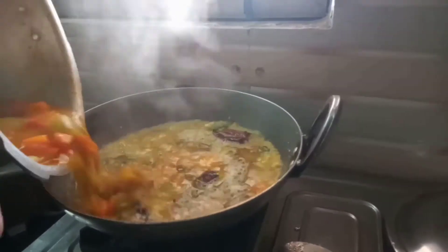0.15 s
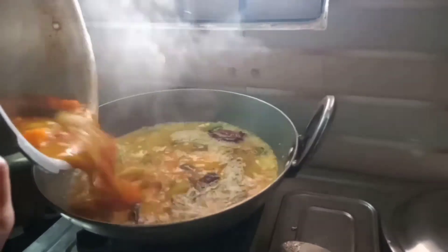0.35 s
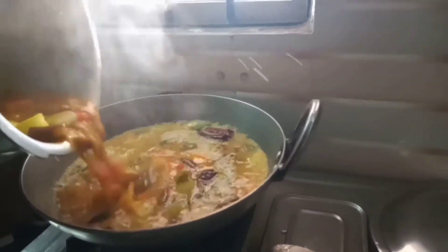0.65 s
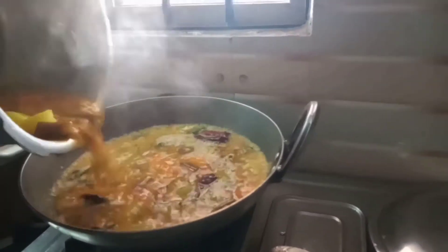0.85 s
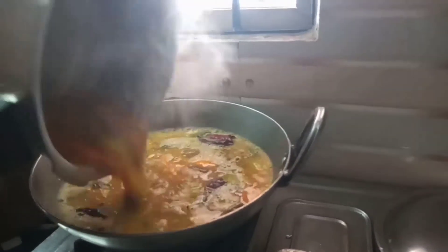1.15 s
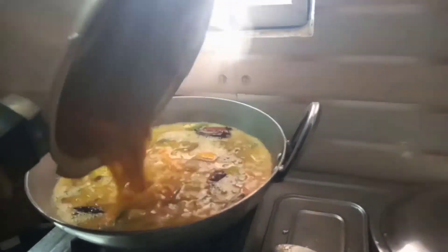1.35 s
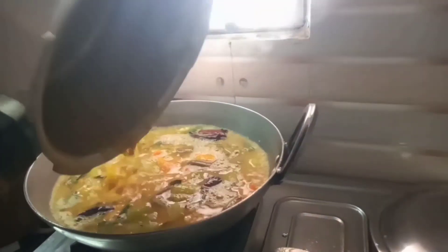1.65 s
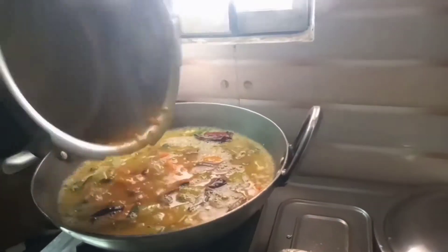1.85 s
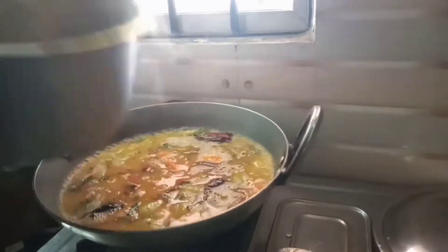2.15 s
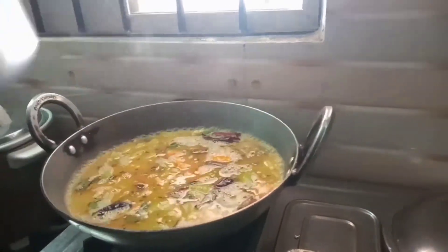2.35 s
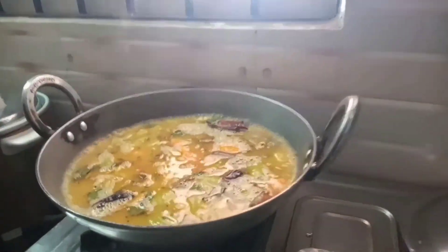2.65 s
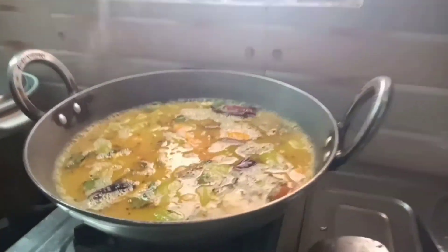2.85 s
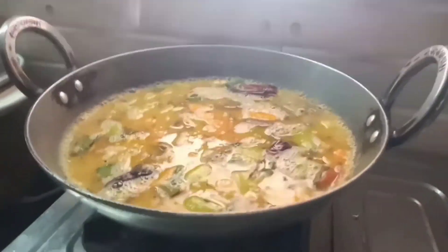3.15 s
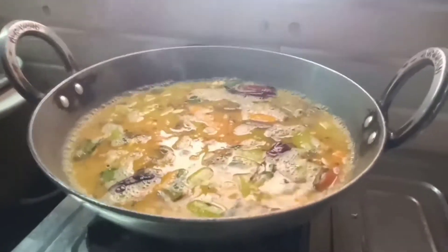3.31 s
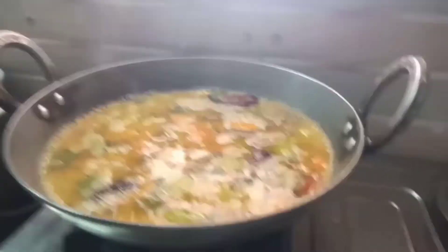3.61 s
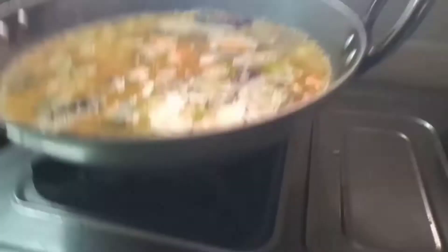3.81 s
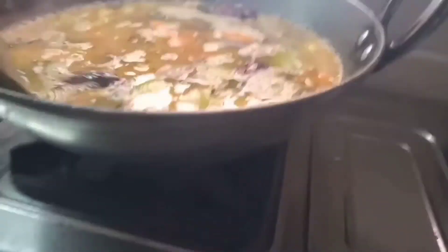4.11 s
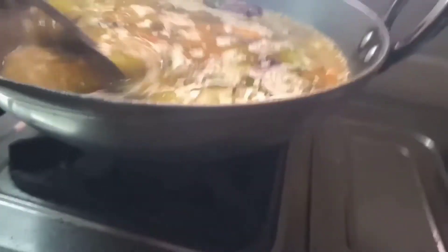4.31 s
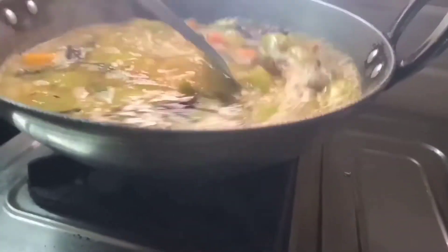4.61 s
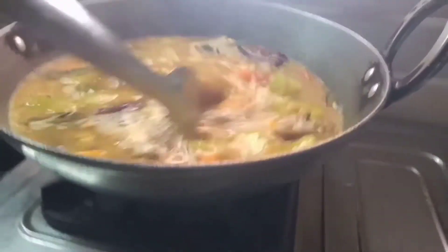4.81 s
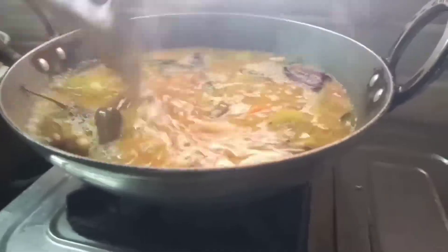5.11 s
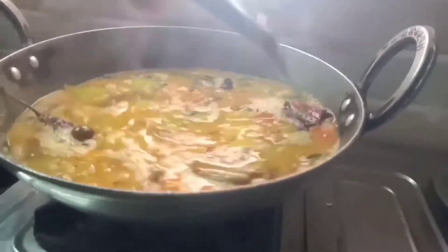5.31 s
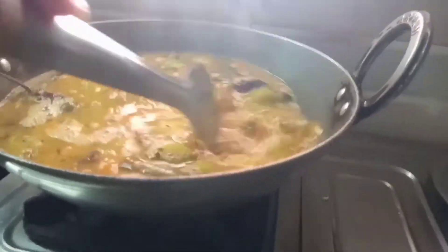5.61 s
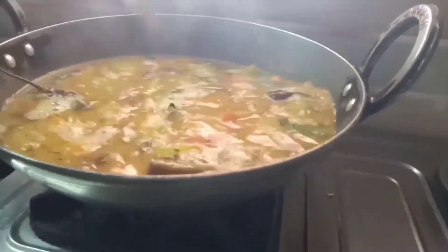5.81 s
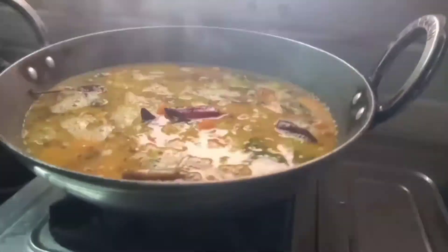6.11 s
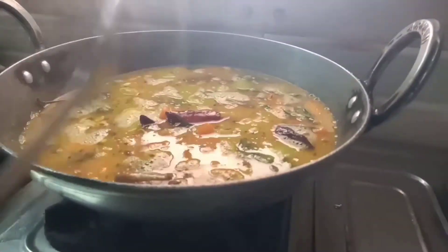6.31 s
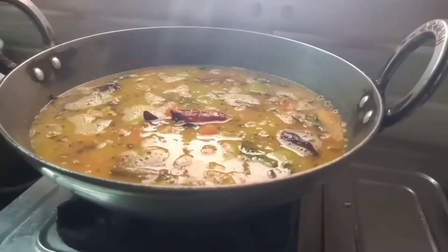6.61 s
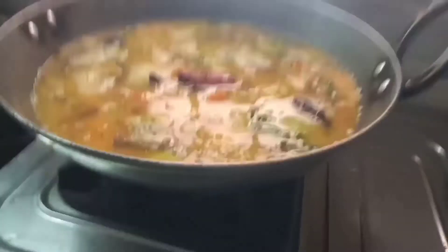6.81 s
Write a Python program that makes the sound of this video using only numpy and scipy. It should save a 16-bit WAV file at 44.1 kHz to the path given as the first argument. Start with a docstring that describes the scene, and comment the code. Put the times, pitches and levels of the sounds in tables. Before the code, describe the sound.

A pan of stew sizzles and bubbles as an empty pot clatters down, then a ladle knocks about and is put aside.

```python
"""Lentil stew poured into hot oil

In a small kitchen, stew is tipped into hot oil in a steel pan over a rumbling gas flame.
Water drops burst in the oil, and the sizzle slowly dies down while the thick stew bubbles.
The empty pot scrapes the rim, then clanks and thumps onto the worktop among other pots.
A ladle stirs, waking the sizzle on the hot wall and knocking dully on the pan.
A few faint hums come and go, and the ladle is laid aside with a clink."""
import sys
import numpy as np
from scipy import signal
from scipy.fft import rfft, irfft
from scipy.io import wavfile

SR = 44100
rng = np.random.default_rng(int(sys.argv[2]) if len(sys.argv) > 2 else 0)


def wav_out(sig):
    """Save sig, one row per channel (or a flat mono array), as 16-bit PCM at SR to the path in sys.argv[1]."""
    wavfile.write(sys.argv[1], SR, np.round(np.clip(np.atleast_2d(sig).T, -1, 1) * 32767).astype(np.int16))


N = 306936
TIME = np.arange(N) / SR

# Levels are relative. A mode is a tone an object rings at; ring_s is the time to fade by 60 dB.
# the steady sizzle sinking as the stew cools the oil: time_s, level_db
COOLING = [(0.0, -30), (0.95, -33.5), (1.45, -34.5), (2.5, -39), (3.05, -43), (3.45, -42), (3.85, -45.5),
           (5.0, -44.5), (5.42, -52), (5.8, -52.5), (6.1, -57), (6.65, -58)]
# the sizzle flaring as stew washes over hot steel: peak_s, level_db, half_length_s
SIZZLE_FLARES = [(0.157, -36.5, 0.017), (0.387, -42, 0.019), (0.604, -33.5, 0.1), (0.87, -38.5, 0.06),
                 (1.097, -36.5, 0.053), (1.304, -34.5, 0.17), (4.028, -43, 0.09), (4.328, -36, 0.1),
                 (4.676, -38, 0.092), (4.883, -38, 0.091), (5.17, -43, 0.083)]
# the stew's bubbling, which settles when the stirring ends: time_s, level_db
SIMMER_LEVELS = [(0.05, -53.5), (0.45, -49), (0.85, -52), (2.2, -55.5), (3.0, -60), (4.7, -56.5),
                 (5.55, -62.5), (6.05, -72.5)]
# how strong each sound is from low to high: pitch_hz, level_db
SIZZLE_TONE = [(250, -31), (800, -6), (1200, -10.5), (1800, -3.5), (2080, 2.5), (2400, 6), (3000, -0.5),
               (3450, 1), (4000, 0.73), (6000, 1.5), (7500, -3), (9000, -13.5), (16000, -43)]
SPRAY_TONE = [(4000, -22.5), (5700, 7.5), (7500, 7.5), (9000, 5.5), (16000, 6)]
STEW_TONE = [(150, -13), (300, 6), (480, 2.5), (780, 10), (1050, 6.5), (1500, 6), (2500, -22.5)]
FLAME_TONE = [(20, -38), (40, -10.5), (70, 3), (112, 10.5), (145, 6.5), (180, -10), (280, -10), (450, -42),
              (1500, -26)]
STEEL_TONE = [(70, -12), (120, 19), (180, -6.5), (280, 9.5), (430, 7), (620, 7.5), (900, 4), (1200, 4.5),
              (1700, -2.5), (2300, 11), (3000, 2), (4600, -4.5), (9000, -5.5), (16000, -3)]
CRACK_TONE = [(500, -65), (1500, 15), (4000, 7), (7000, 12), (9000, 14.5), (16000, 5)]  # the first snap of a bump
POT_AIR_TONE = [(90, -44), (220, 7), (360, 3.5), (540, 15), (720, 7.5), (1050, 10), (1350, -7), (4000, -41)]
# hand-held pots bumping together: start_s, crack_db, body_db, clang_db, ring_s
BUMPS = [(0.214, -13, -34, -22, 0.18), (0.238, -32, -38, -30, 0.58), (1.858, -14, -36, -16.5, 0.051),
         (1.882, -32, -33.5, -27.5, 0.32), (1.904, -13.5, -33, -32, 1), (1.966, -40, -31.5, -27.5, 0.28),
         (1.993, -32, -38.5, -37, 0.3), (2.508, -40, -46, -38, 0.17), (2.615, -10.5, -29, -25, 0.2),
         (2.686, -25.5, -36.5, -33.5, 0.21), (2.758, -39, -24.5, -21, 0.23), (2.799, -43, -36, -29.5, 0.31),
         (3.655, -29, -50, -48, .05), (3.904, -11.5, -47.5, -36.5, 0.27), (3.956, -15, -46.5, -38, 0.24)]
# pots landing on the worktop: start_s, crack_db, body_db, clang_db, ring_s, thump_db
POT_LANDINGS = [(3.28, -23, -39.5, -27.5, 0.14, -31.5), (3.477, -35, -27, -24, 0.24, -29),
                (3.486, -37, -29, -21.5, 0.26, -35), (3.586, -42, -39, -28.5, 0.048, -35),
                (3.632, -45, -46, -46, 0.13, -41.5), (6.871, -18, -36, -24.5, 0.24, -43)]
# the pot's edge skidding over the pan's rim: start_s, level_db, ring_s
RIM_SKIDS = [(1.86, -14.5, 0.049), (1.872, -25, 0.49), (1.905, -27, 0.43), (1.95, -35, 0.22),
             (2.617, -31.5, 0.38), (6.879, -34, .22)]
# the rim's modes: pitch_hz, width_hz, level_db
RIM_MODES = [(2330, 140, 6.5), (3630, 23, 5), (3480, 37, -3), (4260, 48, 3), (4700, 95, 3), (5400, 69, 3.5),
             (6010, 44, 8.5), (5860, 110, -15), (6560, 82, -21)]
# the empty pot and the ladle being put down: start_s, level_db, thump_db
POT_SET_DOWN = [(3.11, -14, -37)]
LADLE_SET_DOWN = [(6.735, -16.5, -42)]
# each object's modes: pitch_hz, level_db, ring_s
EMPTY_POT_MODES = [(528, -3, .48), (646, -5, .5), (1030, -1, .24), (1588, -4, .38), (2310, 4, .47),
                   (2880, -5, .4), (3830, -6, .3), (3880, -3, .38), (4440, -11, .4), (4650, -9, .4),
                   (5355, -4, .5), (6062, -9, .4), (6365, -4, .14), (6680, -3, .24), (7590, -7, .23)]
WORKTOP_MODES = [(79, -13, 0.34), (106, 0.5, 0.41), (137, -5, 0.22), (199.4, 1.5, 0.14), (230.8, -6, 0.3)]
LADLE_MODES = [(1200, -2.5, 0.1), (1432, -1, 0.15), (1620, -2.5, 0.16), (1975, -6.5, 0.29),
               (2260, -0.5, 0.038), (2770, -6.5, 0.029), (3345, -3.5, 0.03), (3450, -2.5, 0.031),
               (3890, -13, 0.2), (5356, -9.5, 0.042)]
FULL_PAN_MODES = [(238, 3, 0.048), (304.3, 3.5, .16), (362, 3, 0.086), (456, -9, 0.029), (582, 0.5, 0.088),
                  (705, 0, .08), (980, -14, 0.08), (1405, -9.5, 0.081), (1887, -11.5, 0.064),
                  (2290, -5.5, 0.034), (2500, -13.5, 0.1), (2730, -17, 0.11)]
HANDLE_MODES = [(277, -3.5, 0.17), (1432, -8, .3), (1896, 9, 0.056), (2190, 1, 0.1), (3370, 7.5, 0.056),
                (4110, -2, 0.091), (5900, -16, .14), (6191, -11, .25), (7630, 5.5, .1), (11680, 0, .13),
                (14700, -10, .06), (15400, -6, .06)]
# the ladle ringing as it is picked up, and its handle dropping: start_s, level_db
LADLE_PICKUPS = [(3.283, -35.5), (3.481, -31.5)]
HANDLE_DROP = [(6.874, -33.5)]
# the ladle hitting the full pan: start_s, knock_db, bass_db, scratch_db, slosh_lead_s
STIR_KNOCKS = [(4.573, -26, -29.5, -33, 0.0037), (4.778, -25, -33, -39, 0.012),
               (4.835, -29, -33.5, -50, .008), (5.1, -29, -26.5, -36, .001), (5.179, -35.5, -39, -49, .004),
               (5.338, -32.5, -36, -58, 0.0046), (5.399, -43, -50, -52, 0.01),
               (5.732, -27.5, -29, -34, 0.0033), (5.971, -32, -33.5, -58, 0.0087),
               (6.037, -38, -46, -57, 0.0093), (6.12, -45, -41.5, -56, .012)]
# faint hums after the stirring: peak_s, level_db, half_length_s, pitch_hz
LOW_HUMS = [(6.17, -57.5, 0.1, 314), (6.316, -58.5, 0.054, 600), (6.487, -62, 0.055, 327),
            (6.625, -60.5, 0.057, 613)]
# the microphone's opening, which has two peaks with a dip between: pitch_hz, gain_db
MICROPHONE_TONE = [(1000, -2), (5100, 1.5), (5700, 3.5), (6150, 9), (6650, 4.5), (7100, -6), (8200, -15.5),
                   (9500, -17), (11000, -19.5), (13800, -18.5), (14700, -8), (16000, -7)]


def from_db(db):
    """Turn decibels into a number to multiply a sound by."""
    return 10 ** (np.asarray(db) / 20)


def unit_power(x):
    """Scale a sound so that its average power is 1."""
    return x / np.sqrt(np.mean(x ** 2) + 1e-20)


def noise():
    """A fresh, even hiss."""
    return rng.standard_normal(N)


def curve(points):
    """Join (time, value) points with straight lines."""
    return np.interp(TIME, *np.transpose(points))


def drift(rate_hz):
    """A smooth random wobble, about 1 in size."""
    step, warm_up = 40, 2000  # in samples
    decay = np.exp(-2 * np.pi * step * rate_hz / SR)
    jitter = rng.standard_normal(N // step + warm_up + 2)
    slow = signal.lfilter([1], [1, -2 * decay, decay * decay], jitter)[warm_up:]
    return np.interp(np.arange(N) / step, np.arange(len(slow)), unit_power(slow))


def shaped(x, tone, size=4096):
    """Make a sound's lows and highs follow a tone table."""
    hz, db = np.transpose(tone)
    grid_hz = np.maximum(np.arange(size // 2 + 1) * SR / size, 1)
    gains = from_db(np.interp(np.log(grid_hz), np.log(hz), db))
    cepstrum = irfft(np.log(gains))
    # fold the filter so that it never rings before the sound arrives
    cepstrum[1:size // 2] *= 2
    cepstrum[size // 2 + 1:] = 0
    return signal.fftconvolve(x, irfft(np.exp(rfft(cepstrum))))[:len(x)]


def band(x, low_hz, high_hz):
    """Keep the part of a sound between two pitches."""
    return signal.sosfilt(signal.butter(2, [low_hz, high_hz], "band", fs=SR, output="sos"), x)


def ring(force, hz, ring_s):
    """One mode: every push starts a pure tone that fades away."""
    decay, angle = from_db(-60 / (ring_s * SR)), 2 * np.pi * hz / SR
    feedback = [1, -2 * decay * np.cos(angle), decay * decay]
    return signal.lfilter([0, np.sin(angle)], feedback, force + 1e-18)


def clicks(per_s, spread_db):
    """Random clicks of uneven size."""
    sizes = from_db(spread_db * np.minimum(rng.exponential(1, N), 5)) * rng.choice([-1, 1], N)
    return sizes * (rng.random(N) < per_s / SR)


def bursts(starts_s, levels_db, ring_s, rise_s):
    """The loudness of hits that rise quickly and die away."""
    power = np.zeros(N)
    for start_s, db, fade_s in np.broadcast(starts_s, levels_db, ring_s):
        start = round(start_s * SR)
        age = TIME[:N - start][:SR]
        rise = 1 - np.exp(-age / rise_s)
        power[start:start + SR] += (rise * from_db(db - 60 * age / fade_s)) ** 2
    return np.sqrt(power)


def swell(peak_s, db, half_length_s):
    """A smooth, bell-shaped rise and fall in loudness."""
    return from_db(db) * np.exp(-.5 * ((TIME - peak_s) / half_length_s) ** 2)


def struck(hits, modes, longest_s, vary_db=0):
    """Hits ring an object; food or a hand cuts long rings short. vary_db mimics hitting new spots."""
    start_s, db = np.transpose(hits)[:2]
    strengths = from_db(db[:, None] + vary_db * rng.standard_normal((len(start_s), len(modes))))
    out = np.zeros(N)
    for k, (hz, mode_db, ring_s) in enumerate(modes):
        force = np.zeros(N)
        force[np.round(start_s * SR).astype(int)] = strengths[:, k]
        out += (-1) ** k * from_db(mode_db) * ring(force, hz, min(ring_s, longest_s))
    return out


def kitchen(x, echo_db, echo_s=0.29):
    """A sound plus its many quick echoes off the close walls."""
    age = TIME[:SR // 2]
    tail = rng.standard_normal(len(age)) * from_db(-60 * age / echo_s) * (age > .003)
    return x + from_db(echo_db) * signal.fftconvolve(x, tail / np.linalg.norm(tail))[:N]


def sizzle():
    """Water drops burst in the oil, in clumps; the hotter it is, the more bursts each second."""
    flare_power = sum(swell(*flare) ** 2 for flare in SIZZLE_FLARES)
    sizzle_db = 10 * np.log10(from_db(curve(COOLING)) ** 2 + flare_power)
    # the finest spray rises faster than the sizzle, and dies out once the oil is nearly quiet
    spray_db = -26.5 + 1.467 * (sizzle_db + 30)
    spray_db -= 7 * np.maximum(-52.5 - sizzle_db, 0)
    per_s = 7000 * from_db(0.46 * (sizzle_db + 27))
    pops = clicks(per_s, spread_db=-1.5) / np.sqrt(per_s)
    clumps = unit_power(kitchen(pops * from_db(1.38 * drift(rate_hz=42)), echo_db=-9.5))
    crackle = from_db(sizzle_db - 4) * unit_power(shaped(clumps, SIZZLE_TONE))
    spray = from_db(spray_db) * unit_power(shaped(clumps, SPRAY_TONE))
    return crackle + spray


def simmer():
    """Bubbles in the thick stew ring very briefly, at many different pitches."""
    bubbles = sum(ring(clicks(per_s=45, spread_db=3.5), hz, ring_s=9 / hz) * np.sqrt(hz)
                  for hz in np.geomspace(200, 2000, 20))
    bubbling = shaped(kitchen(bubbles, echo_db=-0.5), STEW_TONE)
    return from_db(curve(SIMMER_LEVELS)) * unit_power(bubbling)


def flame(fade_db_per_s=1.18):
    """The gas burner's soft rumble flutters and slowly fades."""
    level_db = -50 - fade_db_per_s * TIME + 0.47 * drift(rate_hz=28)
    return from_db(level_db) * unit_power(shaped(noise(), FLAME_TONE))


def clatter():
    """Steel pots bump: a crack, then a rattle whose low notes start later and last longer."""
    hits = BUMPS + [row[:-1] for row in POT_LANDINGS]
    start_s, crack_db, body_db, clang_db, ring_s = np.transpose(hits)
    muffle_db = 6 * (np.arange(len(hits)) >= len(BUMPS))  # the worktop deadens the middle pitches
    rattle = unit_power(clicks(per_s=9000, spread_db=1))
    # thin steel walls have many modes close together
    pitches_hz = np.linspace(1300, 7600, 24) + rng.normal(0, 57.3, 24)
    walls = unit_power(sum(ring(noise(), hz, ring_s=0.055) for hz in pitches_hz))
    metal = shaped(rattle + from_db(-2.5) * walls, STEEL_TONE)

    def layer(low_hz, high_hz, db, stretch, rise_s):
        return unit_power(band(metal, low_hz, high_hz)) * bursts(start_s, db, stretch * ring_s, rise_s)

    crack = unit_power(shaped(rattle, CRACK_TONE)) * bursts(start_s, crack_db - 11, 0.052, rise_s=0.0015)
    low = layer(174, 340, body_db - 1.5, stretch=1.34, rise_s=0.0014)
    middle = layer(483, 980, body_db + 1.5 - muffle_db, stretch=1.04, rise_s=0.00073)
    clang = layer(1174, 2256, clang_db - 3.5, stretch=1, rise_s=0.00033)
    shimmer = layer(2630, 10900, clang_db - 4, stretch=0.92, rise_s=0.00053)
    return crack + low + middle + clang + shimmer


def level_dip():
    """The cooking sounds dip briefly just before the pot touches the rim."""
    return np.interp(TIME, [1.842, 1.848, 1.856, 1.858], [1, .2, .2, 1])


def rim_skid():
    """Steel rubbing on steel keeps the rim's bright tones singing."""
    start_s, level_db, ring_s = np.transpose(RIM_SKIDS)
    rubbing = clicks(per_s=5000, spread_db=1.5)
    rim = sum((-1) ** k * from_db(db) * width_hz * ring(rubbing, hz, np.log(1000) / np.pi / width_hz)
              for k, (hz, width_hz, db) in enumerate(RIM_MODES))
    return unit_power(rim) * bursts(start_s, level_db - 4.5, ring_s, rise_s=0.0011)


def clank(hit, modes, ring_db, crack_db, chatter_db, chatter_s, chatter_hz, longest_s):
    """Steel meets the worktop: it cracks, rings, then chatters to rest in many soft touches."""
    (start_s, level_db, _), = hit
    settling = np.interp((TIME - start_s) / chatter_s, [0, .04, .8, 1.2], [0, 1, .55, 0])
    touches = band(clicks(per_s=1500, spread_db=1), 190, chatter_hz)
    chatter = from_db(level_db + chatter_db) * settling * touches
    # touching the worktop makes every ring much shorter
    buzz = sum(from_db(db) * ring(chatter, hz, ring_s / 10) for hz, db, ring_s in modes)
    crack = unit_power(band(noise(), 900, 7300))
    crack *= bursts([start_s], level_db + crack_db, 0.019, rise_s=0.00037)
    ringing = from_db(ring_db) * (struck(hit, modes, longest_s) + buzz)
    return kitchen(ringing + crack, echo_db=-3)


def pot_down():
    """The empty pot clanks down; the air inside knocks, then booms while the pot rocks to rest."""
    (start_s, level_db, _), = POT_SET_DOWN
    steel = clank(POT_SET_DOWN, EMPTY_POT_MODES, ring_db=-17.5, crack_db=-4,
                  chatter_db=-18, chatter_s=0.13, chatter_hz=4960, longest_s=0.12)
    knock = struck(POT_SET_DOWN, modes=[(706, -5, 0.042), (1004, -4.5, 0.053)], longest_s=.1)
    rocking = np.interp(TIME - start_s, [0, .003, .02, .085, .11, .17], [0, 1, .6, .4, .12, 0])
    boom = from_db(level_db - 15.5) * rocking * unit_power(shaped(noise(), POT_AIR_TONE))
    return steel + knock + boom


def worktop_thumps(delay_s=0.00435):
    """Whatever is put down thumps the worktop a moment after it touches."""
    thumps = [(row[0] + delay_s, row[-1]) for row in POT_SET_DOWN + POT_LANDINGS + LADLE_SET_DOWN]
    return struck(thumps, WORKTOP_MODES, longest_s=.5)


def ladle_clinks():
    """The ladle rings as it is picked up; at the end, its handle drops just after its bowl."""
    handle = struck(HANDLE_DROP, HANDLE_MODES, longest_s=0.24)
    pickups = struck(LADLE_PICKUPS, LADLE_MODES, longest_s=0.14)
    return kitchen(pickups + handle, echo_db=-6)


def ladle_knocks():
    """The ladle sloshes the stew aside, then hits the pan with a dull knock and a short scratch."""
    start_s, knock_db, bass_db, scratch_db, lead_s = np.transpose(STIR_KNOCKS)
    # softer knocks are duller; the bass depends on where the ladle lands
    treble_db = knock_db + 0.73 * (knock_db + 30)
    knock = np.zeros(N)
    for db, low_hz, high_hz in [(bass_db, 0, 400), (knock_db, 400, 1000), (treble_db, 1000, SR)]:
        modes = [mode for mode in FULL_PAN_MODES if low_hz < mode[0] <= high_hz]
        knock += struck(np.c_[start_s, db], modes, longest_s=0.13, vary_db=4.7)
    slosh = unit_power(shaped(noise(), STEW_TONE))
    slosh *= bursts(start_s - lead_s, knock_db - 11, 0.17, rise_s=0.0051)
    scratch = unit_power(band(noise(), 2040, 5500))
    scratch *= bursts(start_s, scratch_db - 8.5, 0.14, rise_s=0.0013)
    return kitchen(from_db(-8.5) * knock, echo_db=-5) + slosh + scratch


def hum(hz, width_hz):
    """A thin slice of hiss, heard as a wavering tone."""
    return unit_power(band(noise(), hz - width_hz / 2, hz + width_hz / 2))


def faint_hums():
    """Quiet low tones swell and fade."""
    return sum(swell(peak_s, db, half_s) * hum(hz, width_hz=39) for peak_s, db, half_s, hz in LOW_HUMS)


def ladle_down():
    """The ladle slides briefly, then drops onto the worktop and rings."""
    rubbing = hum(850, width_hz=77) + from_db(1) * hum(1290, width_hz=90)
    slide = swell(peak_s=6.72, db=-56.5, half_length_s=0.02) * rubbing
    return slide + clank(LADLE_SET_DOWN, LADLE_MODES, ring_db=-6, crack_db=-19,
                         chatter_db=-27.5, chatter_s=0.1, chatter_hz=2870, longest_s=0.1)


def scene():
    """Everything at the stove, heard from just above the pan."""
    cooking = (sizzle() + simmer() + flame()) * level_dip()
    pots = clatter() + rim_skid() + pot_down()
    mix = cooking + pots + worktop_thumps() + ladle_clinks() + ladle_knocks()
    return (mix + faint_hums() + ladle_down())[None]


def record(dry):
    """The microphone's opening colours the sound, and the very highest pitches are cut."""
    cutoff_hz = 15900
    low_pass = signal.ellip(12, .1, 80, cutoff_hz, fs=SR, output="sos")
    return signal.sosfilt(low_pass, shaped(dry[0], MICROPHONE_TONE))[None]


dry = scene()
out = record(dry)
wav_out(out)
```